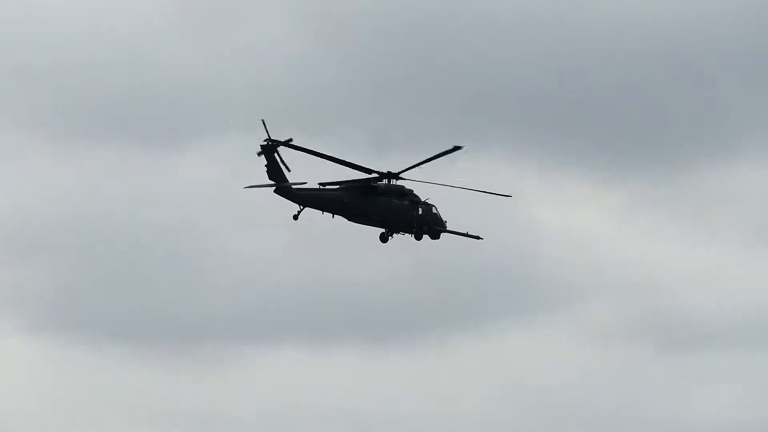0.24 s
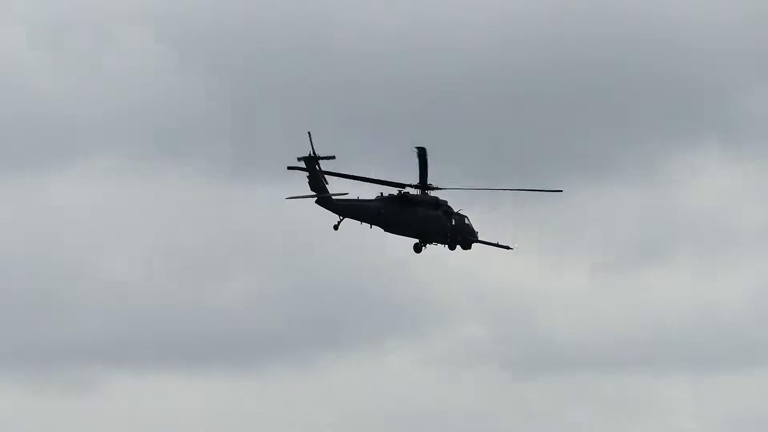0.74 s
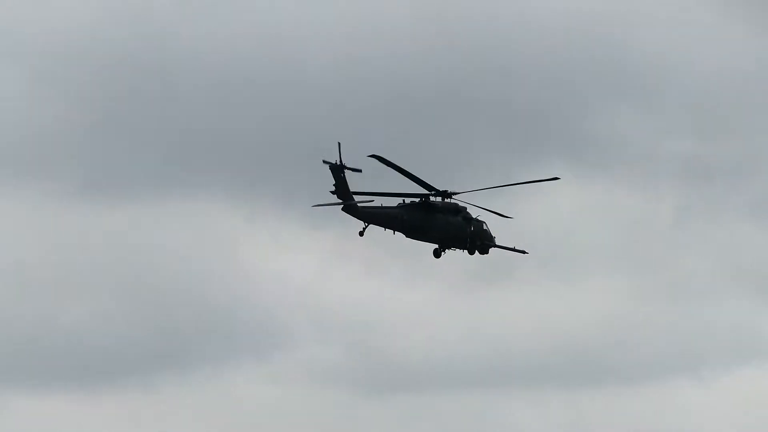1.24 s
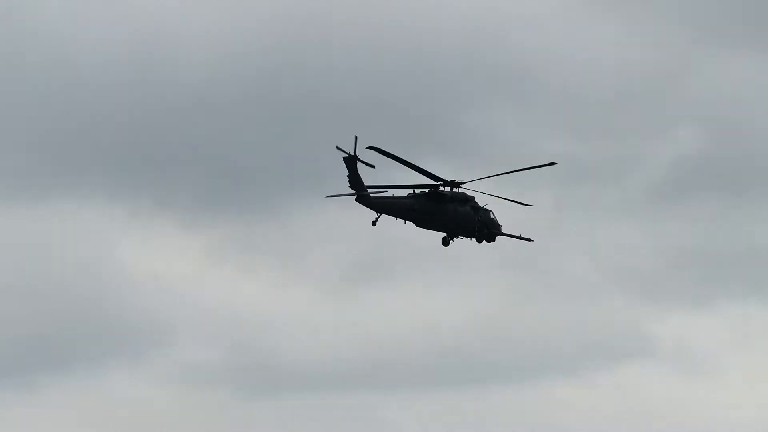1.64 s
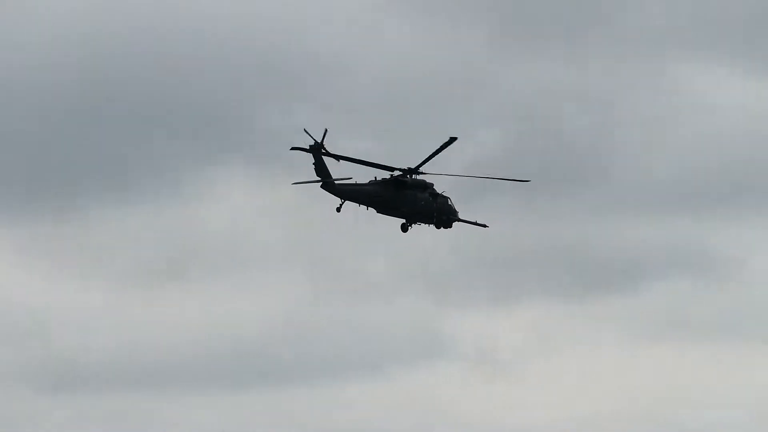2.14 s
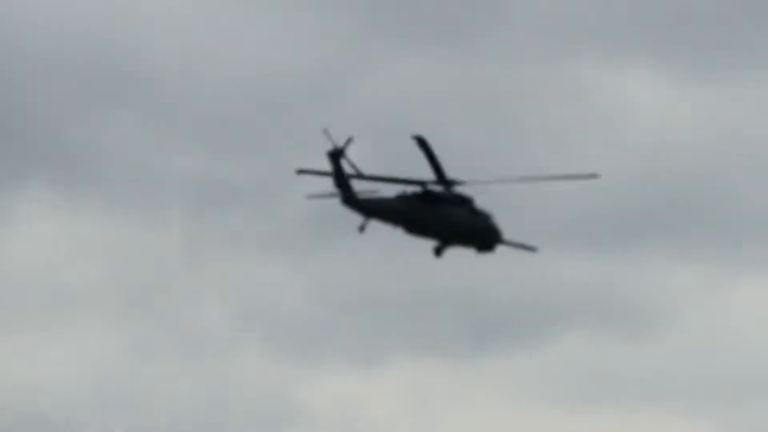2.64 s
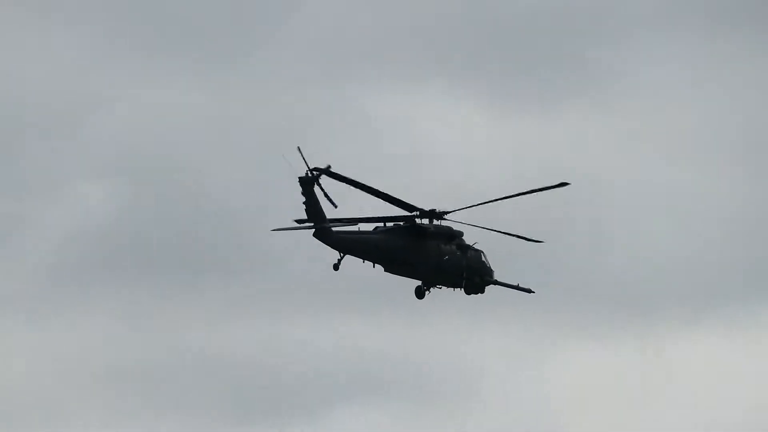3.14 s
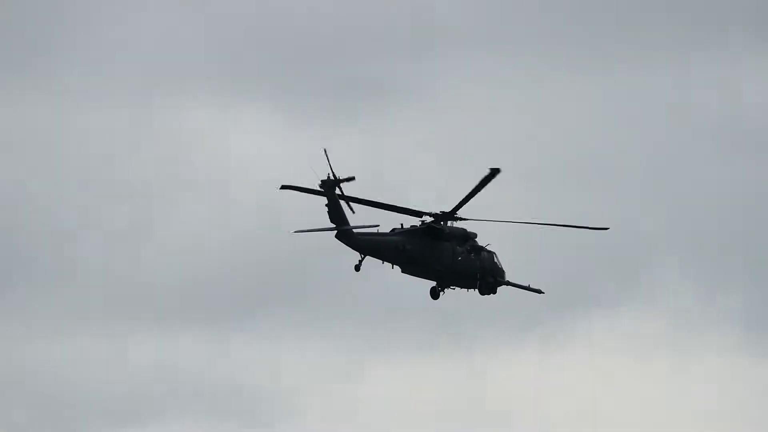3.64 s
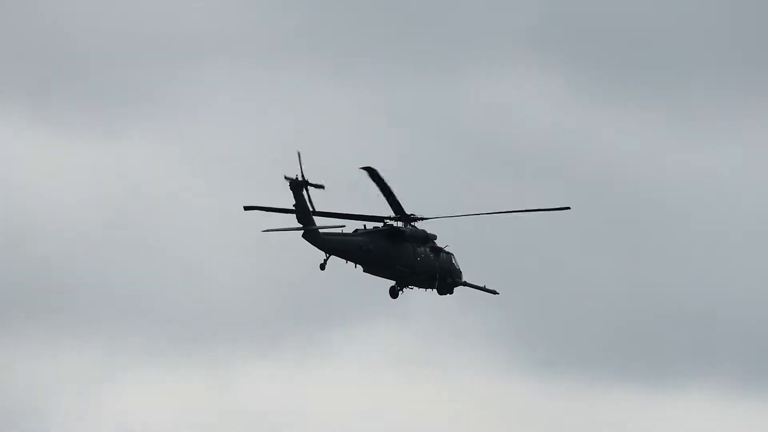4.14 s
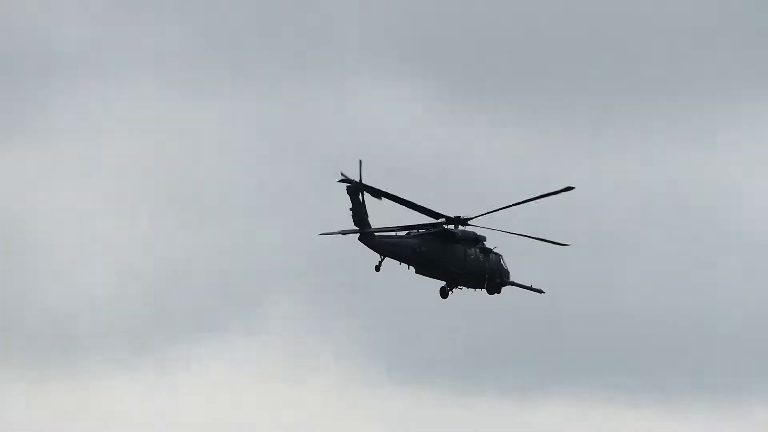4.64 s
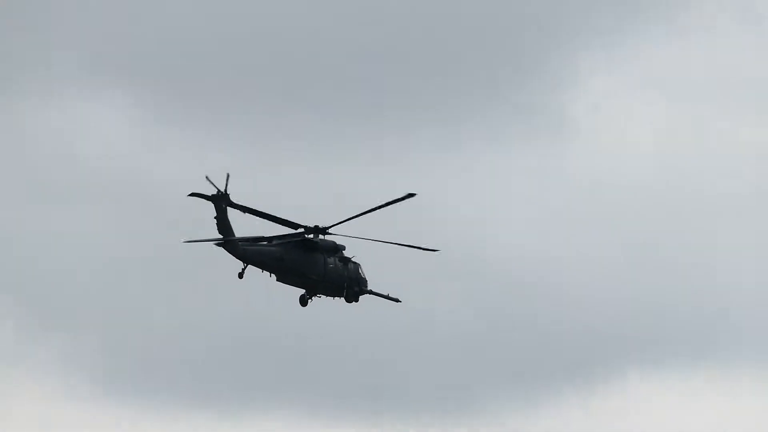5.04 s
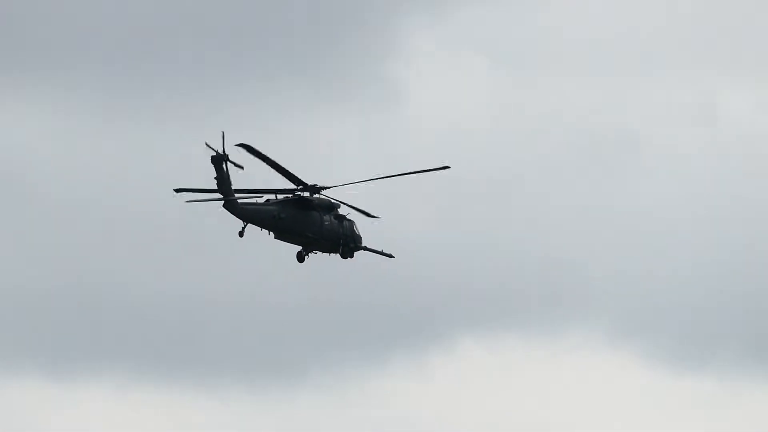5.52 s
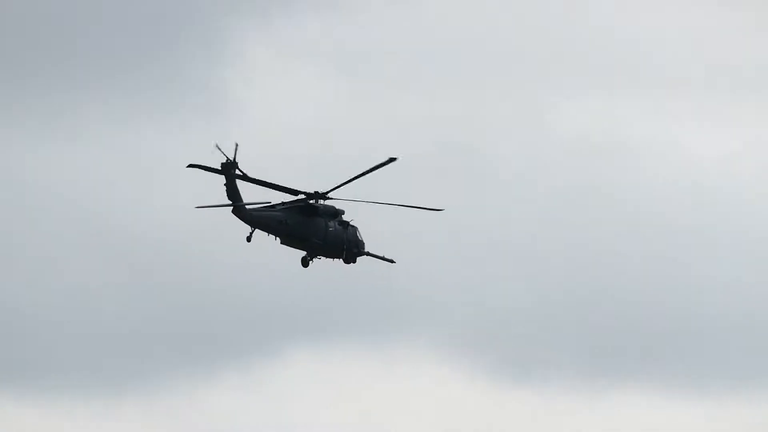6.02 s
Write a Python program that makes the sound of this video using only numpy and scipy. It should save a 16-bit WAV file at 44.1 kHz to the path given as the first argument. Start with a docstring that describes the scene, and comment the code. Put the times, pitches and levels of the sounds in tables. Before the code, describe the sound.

A helicopter is heard throughout, flying away over an open airfield: a broad rush of air and turbine noise with a fast, soft blade throb, a faint tail rotor hum and blurred gear and engine whines. It swells and fades unevenly in the moving air. In the first second, a nearby still camera clicks three times in quick, even succession. From about 1.5 to 3.2 seconds, a zoom lens beside the microphone gives a faint, high whir and scattered small ticks, the sharpest at about 2.2 and 3.2 seconds. A low breeze murmurs underneath, with soft gusts near 2.9 and 4.2 seconds. The helicopter swells briefly around 4.1 seconds, then drops and turns hollow from about 4.7 seconds as its low rumble falls away. Its body returns by about 6 seconds, a little quieter than at the start.

```python
"""An airfield, with a four-bladed helicopter flying away through gusty air.
Its blades throb in a broad rush of stirred air and turbine noise that also bounces off the ground.
The tail rotor and gearbox add faint tones, and late on the sound briefly turns hollow.
Nearby, a still camera clicks through three frames and a zoom lens by the microphone ticks and whirs.
A low breeze murmurs underneath."""
import sys
import numpy as np
from scipy import signal
from scipy.fft import rfft, irfft
from scipy.io import wavfile
from scipy.ndimage import uniform_filter1d

SR = 44100
rng = np.random.default_rng(int(sys.argv[2]) if len(sys.argv) > 2 else 0)


def master_out(mix):
    """Clip the mix to full scale and print it as 16-bit PCM to the path in sys.argv[1]."""
    frames = np.transpose(np.atleast_2d(mix))
    ceiling = np.clip(frames, -1, 1)
    pcm = np.round(ceiling * 32767).astype(np.int16)
    wavfile.write(sys.argv[1], SR, pcm)


N = 276948
TIME = np.arange(N) / SR  # seconds


# The blade beat slows as the helicopter speeds away. Each row: time in seconds, blades heard per second.
BLADE_RATE = [(0, 16.52), (1.5, 16.41), (2.5, 16.25), (4, 16.08), (6.3, 16.02)]

def helicopter():
    """Rushing air, tail rotor, gears and turbines; the main rotor sets the beat."""
    passes = np.cumsum(in_time(BLADE_RATE)[0]) / SR + .05  # running count of blades gone by
    return treble_dips(rush(passes) + tail_rotor(passes) + gearbox(passes) + turbines())


# The rush swells and fades in the moving air.
# Each row: time in seconds, then base levels in dB of the dull wake, the swish and the turbine jet.
RUSH_LEVELS = [(0.0, -24, -28.5, -39.5), (.06, -28.5, -29, -38), (.1, -23, -28.5, -37),
               (.14, -27.5, -31.5, -36.5), (0.23, -22, -26.5, -36.5), (0.48, -21, -27, -33.5),
               (0.6, -23, -32, -38), (0.84, -25.5, -31, -36.5), (.93, -24.5, -28, -39),
               (1.31, -22, -33, -38.5), (1.42, -23, -32, -36.5), (1.85, -22, -27, -34.5),
               (2.24, -26, -28.5, -37), (2.5, -25.5, -32, -39.5), (3.27, -29.5, -32, -41.5),
               (3.5, -24.5, -32, -38), (3.67, -27, -31, -38.5), (3.75, -23.5, -28.5, -37.5),
               (4.07, -22, -29, -36.5), (4.112, -19, -26, -35.5), (4.135, -23, -35, -41),
               (4.18, -29.5, -36.5, -39), (4.3, -27.5, -32, -35), (4.47, -30.5, -32.5, -39.5),
               (4.52, -33, -34.5, -39), (4.61, -29, -36, -40), (4.66, -39.5, -39.5, -45.5),
               (5.2, -32, -36.5, -42), (5.48, -29, -30.5, -39), (5.95, -29.5, -36, -41.5),
               (6.28, -25, -32.5, -41.5)]
# How much each blade swells the sound. Each row: time in seconds, wake depth, swish depth (both 0 to 1).
THROB_DEPTHS = [(0, 0.23, 0.04), (1.1, 0.21, 0.14), (1.8, .11, 0.05), (2.5, 0.13, 0.1), (3.2, 0.09, 0),
                (3.9, 0.07, 0.14), (4.6, 0.1, 0.23), (6.28, 0.04, 0.14)]

def rush(passes):
    """Blades cut rough air and the turbines blow into it; the wake throbs just after the swish."""
    wake_db, swish_db, jet_db = in_time(RUSH_LEVELS)
    wake_depth, swish_depth = in_time(THROB_DEPTHS)
    eddies = drift(53)  # small swirls of air roughen wake, swish and jet together
    wake = blade_wake(wake_db, eddies) * throb(passes, wake_depth, lag=0.16, sharp=1.3)
    swish = blade_swish(swish_db, eddies) * throb(passes, swish_depth, lag=0.033, sharp=1.0)
    jet = turbine_jet(jet_db, eddies) * throb(passes, .5 * swish_depth, lag=0.05, sharp=0.58)
    return wake + swish + jet


def throb(passes, depth, lag, sharp):
    """A swell for every blade, no two equally strong; lag is a share of the gap between blades."""
    turn = passes - lag
    strength = np.interp(turn, np.arange(N), from_db(2.2 * rng.standard_normal(N)))
    swell = strength * np.exp(sharp * (np.cos(2 * np.pi * turn) - 1))
    return rms_one(1 + depth * rms_one(swell - swell.mean()) / np.sqrt(2))


# The tone colour of the low rush. Each row: frequency in Hz, relative level in dB.
WAKE_COLOUR = [(60, -58.5), (100, -53.5), (150, -33.5), (190, -18.5), (230, -6.5), (280, -5), (345, 2.5),
               (420, 1.5), (530, 1), (620, -4.5), (690, -4.5), (780, -11), (1100, -14.5)]
FLUTTER_HZ = 3.3  # rough air on the way makes the level flutter

def blade_wake(wake_db, eddies):
    """The dull air behind the blades, over a rumble that sinks as the helicopter leaves."""
    rumble_db = -31.5 + 0.91 * (wake_db - wake_db.mean()) - 1.98 * TIME - 23 * hollow()
    rumble = from_db(rumble_db + drift(4.5)) * airborne(WAKE_COLOUR, 130, 333)
    level = from_db(wake_db - 1.56 + drift(FLUTTER_HZ) + .5 * drift(42) + 0.24 * eddies)
    air = airborne(WAKE_COLOUR, 332, 874)
    narrow_band = rms_one(resonate(air, hz=455, width=72))
    narrowing = 0.77 * hollow() ** 2
    return rumble + level * (air + narrowing * (narrow_band - air))


# The tone colour of swish, jet and hiss. Each row: frequency in Hz, relative level in dB.
BRIGHT_COLOUR = [(600, -6), (950, -11), (1300, -11), (1650, -16.5), (2000, -17), (2450, -22.5), (2700, -21),
                 (2900, -23.5), (3250, -22), (3900, -26), (4300, -31), (4750, -38.5), (6000, -50),
                 (7700, -50)]
# The swish has a peak that moves as the rotor turns away.
# Each row: time in seconds, pitch in Hz, share of the power from 0 to 1.
SWISH_PEAK = [(0, 869, 0.4), (.55, 900, 0.23), (1, 1135, 0.38), (1.5, 1230, 0.04), (1.899, 1306, 0.1),
              (2.8, 1370, 0.63), (3.3, 1381, 0.26), (3.749, 1526, 0.18), (4.098, 1406, .05),
              (4.45, 1505, 0.31), (4.75, 1266, 0.6), (5.1, 1285, 0.35), (5.501, 1251, 0.3),
              (5.85, 1250, 0.23), (6.28, 945, 0.44)]

def blade_swish(swish_db, eddies):
    """The blade edges slice the air with a fluttering swish."""
    level = from_db(swish_db + drift(FLUTTER_HZ) + 0.45 * drift(45) + 0.32 * eddies)
    return level * gathered(airborne(BRIGHT_COLOUR, 802, 1800), SWISH_PEAK, width=305)


# At times the jet whooshes. Each row: time in seconds, pitch in Hz, share of the power from 0 to 1.
JET_PEAK = [(0, 1848, 0), (0.801, 1803, 0.29), (1.5, 1881, 0.33), (1.85, 2040, 0.25), (2.15, 2020, 0.32),
            (2.6, 2000, 0.04), (3.9, 1949, 0.05), (4.15, 2100, 0.05), (4.3, 2110, 0.4), (4.7, 2137, 0),
            (5.2, 2147, 0.16), (5.55, 2135, 0.23), (6.28, 2104, 0.03)]

def turbine_jet(jet_db, eddies):
    """The exhaust rushes and hisses; with distance the air soaks up the hiss, its thin top fastest."""
    level = from_db(jet_db - 0.8 + 0.93 * drift(70) + .5 * eddies)
    jet = level * gathered(airborne(BRIGHT_COLOUR, 1596, 4600, order=11), JET_PEAK, width=340)
    swing_db = jet_db - jet_db.mean()
    hiss = from_db(-58.5 + 1.2 * swing_db - 0.5 * TIME) * airborne(BRIGHT_COLOUR, 4520, 5560, order=12)
    top = from_db(-63 + swing_db - 1.5 * TIME) * noise(BRIGHT_COLOUR, 5400, 6700)
    return jet + hiss + top


# The bounce off the ground comes sooner towards the horizon and flips over at a shallow angle.
# Each row: time in seconds, delay in milliseconds, strength from -1 to 1 (below 0 is flipped).
GROUND_BOUNCE = [(0, 1.8, 0.28), (1.9, 1.65, 0.015), (2.6, 1.1, 0.19), (3.4, 1.09, -0.22),
                 (4.9, 1.09, -0.12), (6.28, 0.67, 0.036)]

def airborne(colour, low, high, order=7):
    """Rushing noise plus its late copy from the ground, held at a steady level."""
    direct = noise(colour, low, high, order)
    delay_ms, strength = in_time(GROUND_BOUNCE)
    bounce = strength * np.interp(TIME - delay_ms / 1000, TIME, direct)
    sooner_bounce = 0.19 * hollow() * np.interp(TIME - 0.00071, TIME, direct)
    heard = direct + bounce + sooner_bounce
    slow_power = uniform_filter1d(uniform_filter1d(heard ** 2, 5000), 2500)
    return heard / np.sqrt(slow_power)


def hollow():
    """From 0 to 1: rumble and tail tones drop, the wake narrows and a second bounce joins."""
    return envelope(start=4.64, attack=0.18, hold=0.3, release=0.9)


# The tail rotor's tones. Each row: multiple of its blade rate, relative level in dB.
TAIL_TONES = [(1, -70), (2, -60), (3, -50.5), (4, -42.5), (5, -41)]
TAIL_PASSES_PER_MAIN_PASS = 4.6

def tail_rotor(passes):
    """Geared to the main rotor, it hums with tones that rise and fall with the wake."""
    beam_db = 12.5 * np.exp(-TIME / 0.99)  # an extra beam of sound fades as the tail turns
    level_db = in_time(RUSH_LEVELS)[0] + 18.5 + beam_db - 17 * hollow() ** 2
    phase = 2 * np.pi * passes * TAIL_PASSES_PER_MAIN_PASS
    tones = sum(from_db(db + 3.1 * drift(3.9)) * np.sin(k * phase + 0.24 * k * drift(2.5))
                for k, db in TAIL_TONES)
    return from_db(level_db) * tones


# The gear whines change as the helicopter turns.
# Each row: time in seconds, level of the low whine in dB, level of the high whine in dB.
GEAR_LEVELS = [(0, -23.5, -40), (.45, -24, -35.5), (.75, -35, -41.5), (1.7, -24.5, -58),
               (2.801, -40, -50.5), (4, -29, -47), (4.25, -37.5, -54), (4.7, -57.5, -57), (5.3, -38, -55),
               (5.9, -31, -52), (6.28, -48, -43)]

def gearbox(passes):
    """Two gear whines follow the rotor's speed and throb with the wake."""
    speed = in_time(BLADE_RATE)[0] / 16.4
    low_db, high_db = in_time(GEAR_LEVELS)
    low = from_db(low_db) * whine(597 * speed, width=67)
    high = from_db(high_db) * whine(944 * speed, width=29)
    return (low + high) * throb(passes, in_time(THROB_DEPTHS)[0], lag=0.13, sharp=1.6)


# One low whine, then a high one from each of the two engines. Each row: pitch in Hz, width in Hz.
TURBINE_WHINES = [(2715, 190), (4260, 110), (4440, 200)]
# They change as the engines turn. Each row: time in seconds, then the three whines' levels in dB.
TURBINE_LEVELS = [(0, -49, -57, -66), (.7, -54, -58.5, -61), (1.3, -50.5, -54, -65), (2.4, -52.5, -56, -58),
                  (3.2, -55.5, -64, -71), (3.7, -55.5, -56, -56), (4.3, -59.5, -55, -55.5),
                  (4.9, -50.5, -58, -60), (5.5, -54, -56, -62), (6.28, -51.5, -54.5, -58)]

def turbines():
    """The spinning turbines make blurred whines, each wavering in pitch on its own."""
    return sum(from_db(db) * whine(hz + 35 * drift(5), width)
               for (hz, width), db in zip(TURBINE_WHINES, in_time(TURBINE_LEVELS)))


# Two dips in the treble. Each row: frequency in Hz, width in Hz, depth from 0 to 1.
TREBLE_DIPS = [(3593, 130, 0.7), (4046, 170, 0.9)]
LONG_ZOOM_START_S, LONG_ZOOM_HOLD_S = 2.42, 0.73

def treble_dips(sound):
    """Narrow bands of the helicopter's treble sink while the lens makes its long run."""
    sunk = envelope(LONG_ZOOM_START_S, 0.15, LONG_ZOOM_HOLD_S, .04)
    for hz, width, depth in TREBLE_DIPS:
        sound = sound - depth * sunk * resonate(sound, hz, width)
    return sound


# When the shutter is released. Each entry: start in seconds.
FRAME_STARTS = [0.0700, 0.4076, 0.7453]
# The mirror and shutter clicks of one frame.
# Each row: seconds after the release, relative level in dB, extra dB for the low knock.
SHUTTER_CLICKS = [(0, -38.5, -8), (0.0148, -38, 3), (0.0217, -36, 4.5), (.025, -45, -2),
                  (0.0432, -31.5, -1.5), (.0515, -37, -1), (.0625, -48, 3), (.0705, -47, 0),
                  (.0785, -45, -1), (0.0812, -44, 3), (0.0848, -35, 1.5), (.0965, -51, 0), (.104, -44, -2)]
# The spring and winder rattle. Each row: seconds after the release, relative level in dB.
WINDER_LEVELS = [(-.012, -71), (0.017, -54), (.035, -63), (.06, -56), (.085, -52), (.1, -63), (.125, -69)]
# How the camera body rings. Each row: pitch in Hz, width in Hz, relative level in dB.
CAMERA_RINGS = [(4360, 940, 12), (5750, 440, 6.5), (8470, 360, 2), (9870, 330, -4.5), (11000, 380, -7.5),
                (12350, 450, -9)]
WINDER_TEETH_PER_S = 900  # on average

def still_camera():
    """Each frame clicks through the same cycle while the winder's teeth rattle the same body."""
    clicks = [(start + s, db, knock_db) for start in FRAME_STARTS for s, db, knock_db in SHUTTER_CLICKS]
    tick, knock = contacts(clicks, decay_s=0.0014)
    after, winder_db = np.transpose(WINDER_LEVELS)
    level = sum(np.interp(TIME - start, after, from_db(winder_db), 0, 0) for start in FRAME_STARTS)
    catches = rng.random(N) < WINDER_TEETH_PER_S / SR
    teeth = level * rms_one(catches * rng.choice([-1, 1], N))
    return from_db(0.5) * body(CAMERA_RINGS, tick + teeth, knock + teeth, top_hz=12000, low_rings=2)


# The lens motor's runs. Each row: start, rise, hold and fall in seconds, then relative level in dB.
MOTOR_RUNS = [(1.1, .4, .25, .1, -70), (1.622, 0.02, 0.044, 0.042, -56.5), (1.769, 0.061, 0.58, .1, -66),
              (2.397, .008, 0.86, 0.032, -59.5), (3.15, .025, .005, 0.028, -49)]
# The tone colour of its whir. Each row: frequency in Hz, relative level in dB.
MOTOR_COLOUR = [(5000, 0), (7000, -12), (7800, -9.5), (9000, -1.5), (10100, -2.5), (11000, -4.5),
                (11700, -9), (12400, -8.5), (13900, -14), (14800, -12), (15800, -15.5)]
# The lens barrel's clicks. Each row: start in seconds, relative level in dB, extra dB for the low knock.
BARREL_CLICKS = [(1.6245, -21, -1), (1.7432, -39, -10), (1.7515, -37, 19), (1.962, -33, 6),
                 (2.2495, -14.5, -9), (2.252, -19, -2), (2.3055, -23, -15), (2.3315, -26, 4),
                 (2.3472, -34, -5), (2.9692, -25.5, 5), (3.182, -16, -9), (3.1853, -7, -4),
                 (4.4712, -32, -10), (4.815, -39, -13)]
# How the lens housing rings. Each row: pitch in Hz, width in Hz, relative level in dB.
LENS_RINGS = [(2000, 1250, 3), (4500, 1500, -3), (5900, 1000, -12.5), (8940, 1700, -4.5), (9860, 540, -4.5),
              (10850, 550, -5.5), (12600, 1100, -9), (14800, 970, -12)]

def zoom_lens():
    """A small motor whirs and sings under load; the barrel clicks as it starts and stops."""
    runs = [from_db(db) * envelope(*timing) for *timing, db in MOTOR_RUNS]
    level = np.maximum(from_db(-73.5), np.max(runs, axis=0))  # it idles faintly between runs
    grain = from_db(2.2 * drift(120) - 1.0)
    whir = level * grain * noise(MOTOR_COLOUR, 5000, 17000)
    long_run = envelope(LONG_ZOOM_START_S, 0.03, LONG_ZOOM_HOLD_S, 0.08)
    singing = long_run * from_db(-65) * whine(10450, width=450)
    tick, knock = contacts(BARREL_CLICKS, decay_s=0.00083)
    return whir + singing + from_db(-4.5) * body(LENS_RINGS, tick, knock, top_hz=12200, low_rings=3)


def contacts(clicks, decay_s, size=1500):
    """Parts meet in tiny rattles; returns the pushes on a body's high rings and low rings."""
    t = np.arange(size) / SR
    after_ring = from_db(-24.5) * np.exp(-t / 0.0054)
    rattles = rng.choice([-1, 1], (len(clicks), size)) * (np.exp(-t / decay_s) + after_ring)
    tick, knock = np.zeros((2, N))
    for (s, db, knock_db), rattle in zip(clicks, rattles):
        at = round(s * SR)
        tick[at:at + size] += from_db(db) * rattle
        knock[at:at + size] += from_db(db + knock_db) * rattle
    return tick, knock


def body(rings, tick, knock, top_hz, low_rings):
    """Knocks sound the lowest rings and ticks the rest; plastic muffles the very top."""
    ringing = sum(from_db(db) * resonate(knock if k < low_rings else tick, hz, width)
                  for k, (hz, width, db) in enumerate(rings))
    return signal.sosfilt(signal.butter(5, top_hz, fs=SR, output="sos"), ringing)


# The tone colour of the breeze. Each row: frequency in Hz, relative level in dB.
BREEZE_COLOUR = [(50, -33.5), (75, -24.5), (110, -10), (165, 1.5), (225, -2.5), (290, -9), (500, -20)]
# The gusts. Each row: time of the peak in seconds, dB added to the breeze.
GUSTS = [(2.87, 9.5), (3.65, -0.5), (4.171, 13), (4.57, 6.5)]
GUST_RISE_S, GUST_FALL_S = 0.066, 0.12

def breeze():
    """Air over the field builds from calm to a lumpy murmur; gusts rise quickly and die away."""
    level_db = np.interp(TIME, [0, 3.1], [-67.5, -55])
    for s, db in GUSTS:
        level_db += db * np.exp(-np.maximum((s - TIME) / GUST_RISE_S, (TIME - s) / GUST_FALL_S))
    return from_db(level_db + 2.9 * drift(8.5)) * noise(BREEZE_COLOUR, 60, 550)


def from_db(db):
    """Turns decibels into a factor to multiply by."""
    return 10 ** (np.asarray(db) / 20)


def rms_one(x):
    """Scales a signal to an average power of 1."""
    return x / np.sqrt(np.mean(x ** 2) + 1e-20)


def in_time(rows):
    """Joins a table's rows with straight lines: one curve for each column after the time."""
    seconds, *columns = np.transpose(rows)
    return [np.interp(TIME, seconds, column) for column in columns]


def envelope(start, attack, hold, release):
    """Rises from 0 to 1, holds and falls back; times are in seconds."""
    return np.interp(TIME, start + np.cumsum([0, attack, hold, release]), [0, 1, 1, 0])


def drift(rate_hz, size=16384):
    """A random wobble about 1 in size, mostly slower than rate_hz."""
    hz = np.arange(size // 2 + 1) * SR / N
    spectrum = rfft(rng.standard_normal(size)) / (1 + (hz / rate_hz) ** 2)
    return np.interp(np.linspace(0, size - 1, N), np.arange(size), rms_one(irfft(spectrum, size)))


def noise(colour, low, high, order=7):
    """Noise of a given tone colour between two soft edges in Hz; a higher order makes them steeper."""
    hz = np.maximum(np.arange(N // 2 + 1) * SR / N, 1)
    points, db = np.transpose(colour)
    shape = from_db(np.interp(np.log(hz), np.log(points), db))
    edges = np.sqrt((1 + (low / hz) ** (2 * order)) * (1 + (hz / high) ** (2 * order)))
    return rms_one(irfft(rfft(rng.standard_normal(N)) * shape / edges, N))


def resonate(x, hz, width):
    """Lets one band ring through; the narrower it is, the longer it rings."""
    r = np.exp(-np.pi * width / SR)
    feedback = [1, -2 * r * np.cos(2 * np.pi * hz / SR), r * r]
    return signal.lfilter(np.array([1, 0, -1]) * (1 - r * r) / 2, feedback, x + 1e-18)


def whine(hz, width):
    """A steady or gliding tone, blurred by random wobble over about width Hz."""
    cycles = np.cumsum(hz * np.ones(N)) / SR
    blur = drift(width / 2) + 1j * drift(width / 2)
    return rms_one(np.real(blur * np.exp(2j * np.pi * cycles)))


def gathered(air, peak, width):
    """Trades a share of a noise's power for a blurred tone at a moving pitch."""
    hz, share = in_time(peak)
    return np.sqrt(1 - share) * air + np.sqrt(share) * whine(hz, width)


def scene():
    """The helicopter, the breeze, the camera and the lens over a faint steady hush, in mono."""
    hush = from_db(-79) * noise([(20, -24), (50, -22), (72, -7), (200, -3), (8000, -22)], 15, 15000)
    return (helicopter() + breeze() + still_camera() + zoom_lens() + hush)[None]


def record(dry):
    """The microphone's opening carves a dip in the treble; deep bass and the very top are cut."""
    notched = signal.lfilter(*signal.iirnotch(7570, Q=2.04, fs=SR), dry)
    sound = notched + from_db(-9.5) * (dry - notched)
    sound = signal.sosfilt(signal.butter(2, 62, "high", fs=SR, output="sos"), sound)
    return signal.sosfilt(signal.ellip(10, .1, 80, 15800, fs=SR, output="sos"), sound)


dry = scene()
out = record(dry)
master_out(out)
```